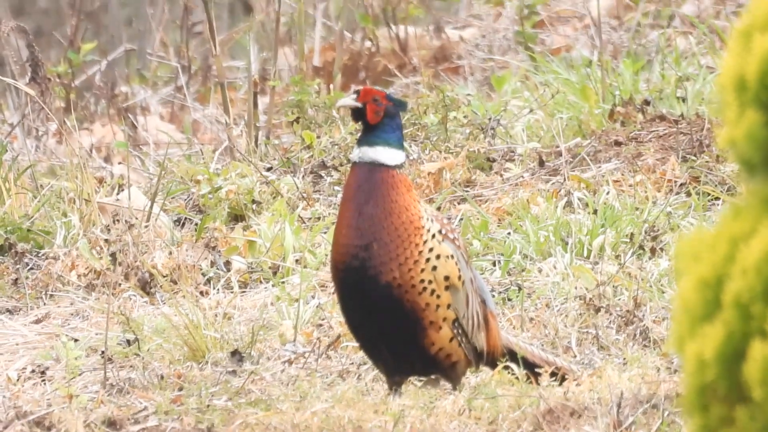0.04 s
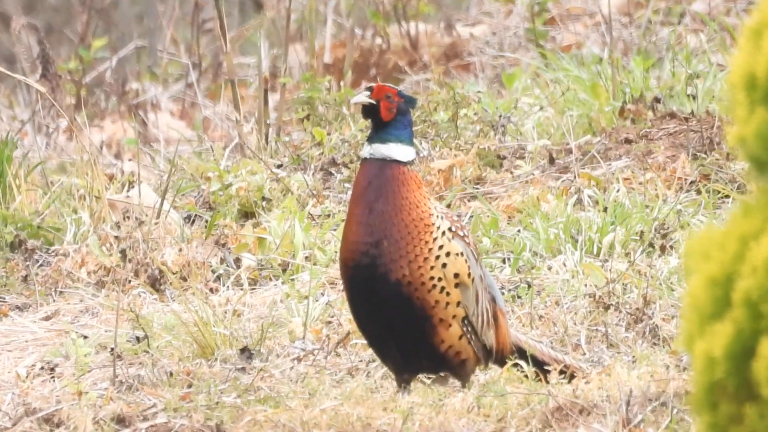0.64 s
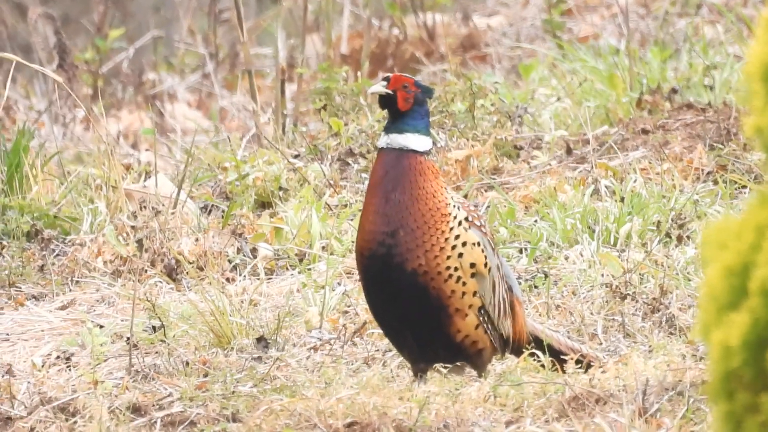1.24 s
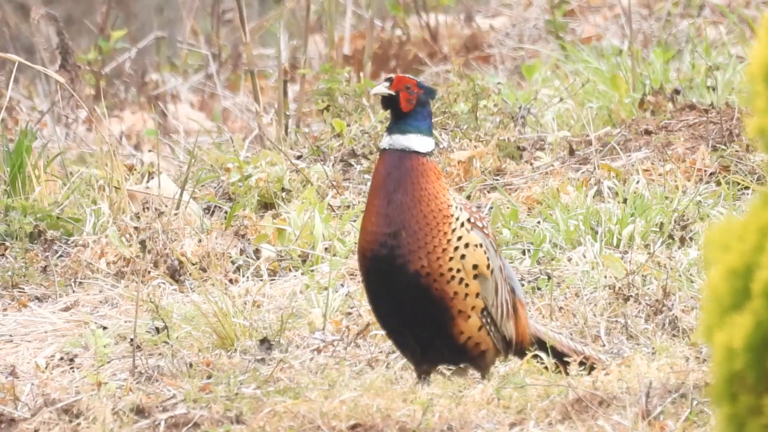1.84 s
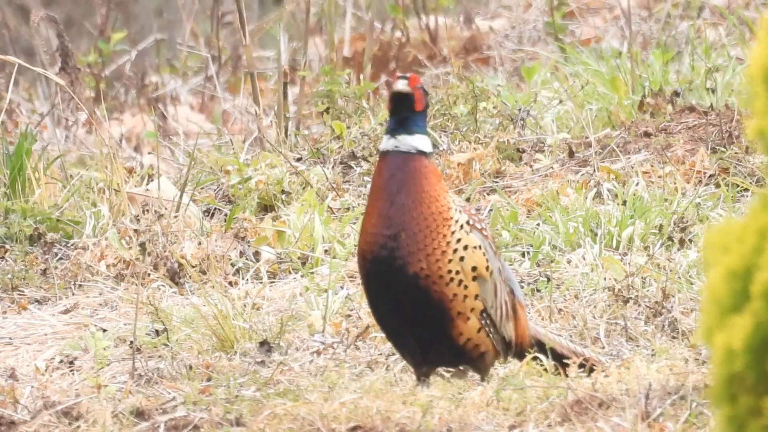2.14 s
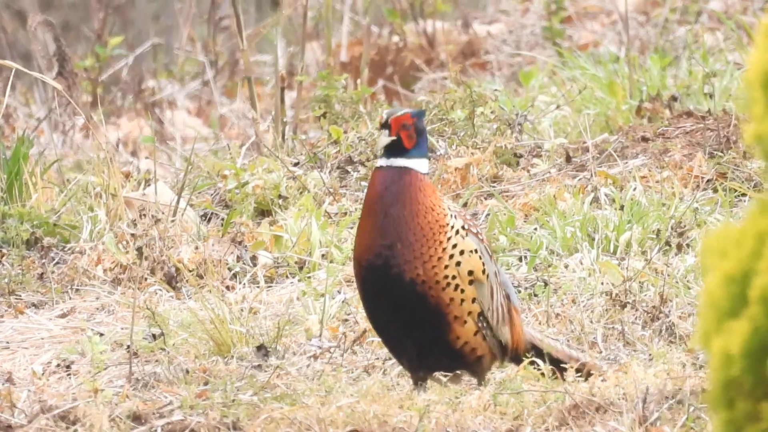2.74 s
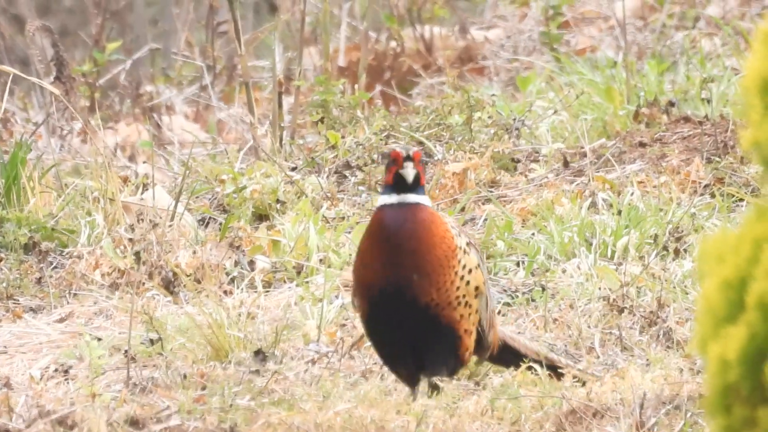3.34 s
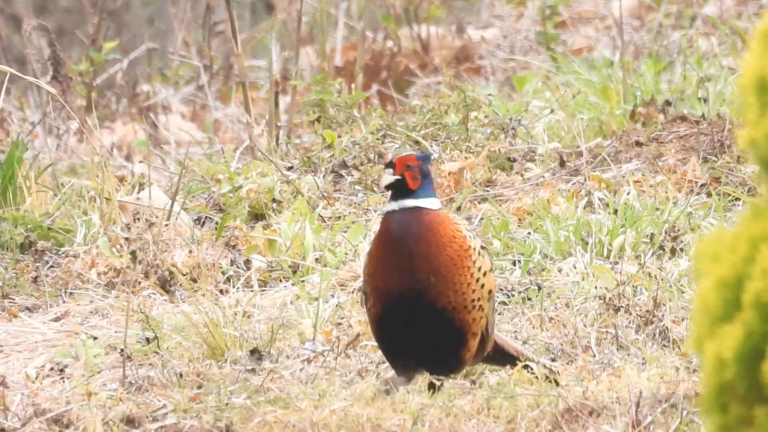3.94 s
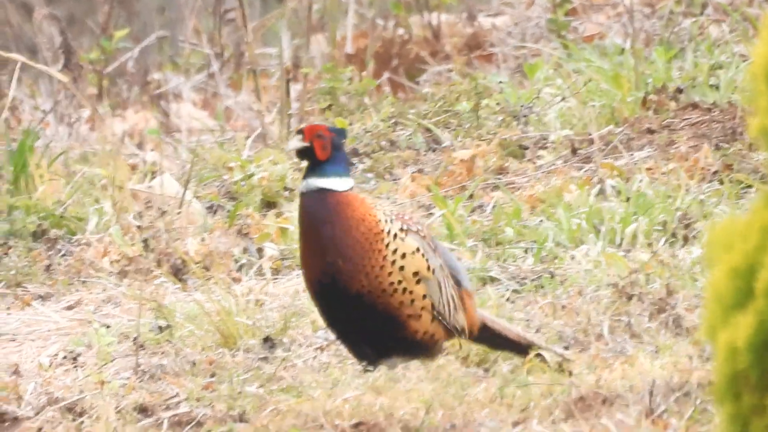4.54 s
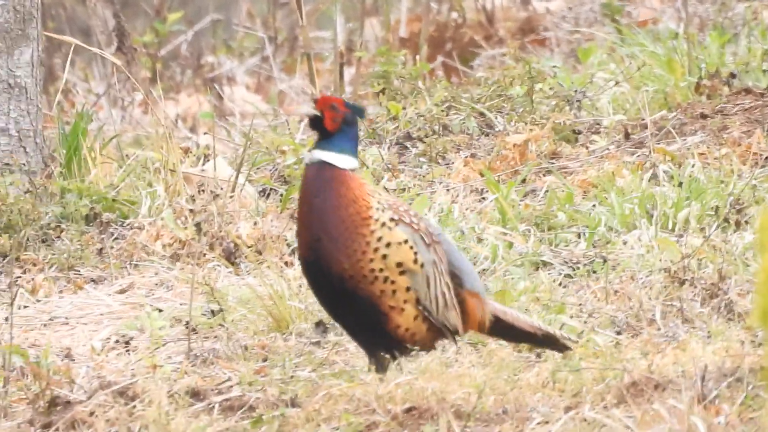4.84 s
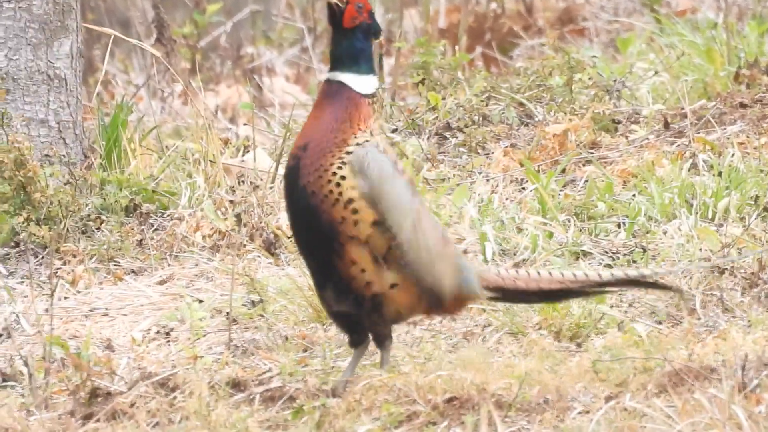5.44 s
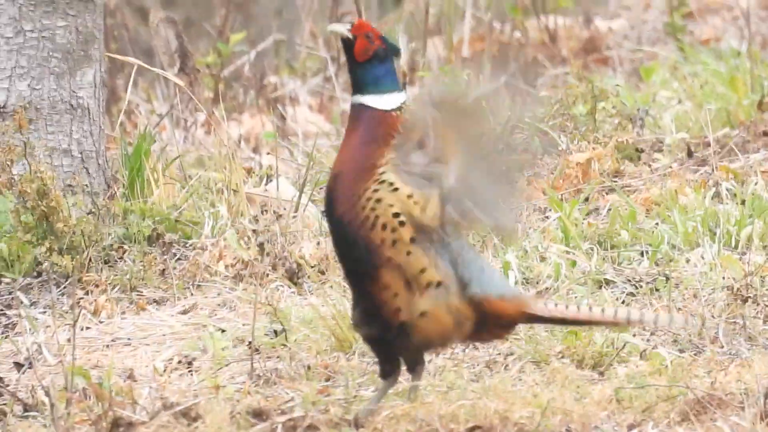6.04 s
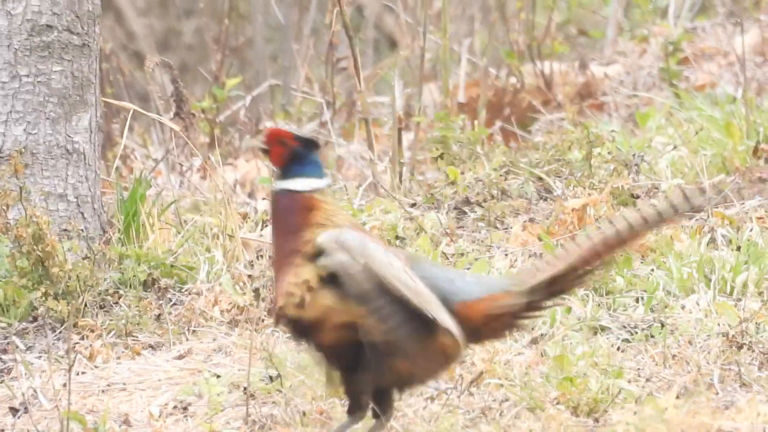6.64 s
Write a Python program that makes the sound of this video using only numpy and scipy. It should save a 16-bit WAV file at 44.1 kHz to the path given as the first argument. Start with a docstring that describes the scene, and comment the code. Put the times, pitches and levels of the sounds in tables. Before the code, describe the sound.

A quiet hush of open air lies over dry grass at the edge of a wood. Far off to the left, crows caw and small birds chirp and sing thin buzzy notes, while dry stalks tick faintly nearby. Near the end a pheasant, close and almost straight ahead, gives a loud, harsh two-note crow that rings briefly among the trees, followed by a soft, quick whir of wings.

```python
"""Dry grass by the edge of a wood, a cock pheasant close to the microphone and nearly straight ahead.
Late on he gives his harsh two-note crow, the syrinx flipping between tone and flutter under a rasp
from the open beak, and starts to whirr his wings. The wood throws the crow back and lets it ring.
Stalks tick nearby. Far off to the left, crows caw, a small bird sings thin buzzy notes and others
chirp, all over a quiet hush of open air."""
import sys
import numpy as np
from scipy import signal
from scipy.fft import rfft, irfft, next_fast_len
from scipy.io import wavfile
from scipy.ndimage import uniform_filter1d, map_coordinates

SR = 44100
rng = np.random.default_rng(int(sys.argv[2]) if len(sys.argv) > 2 else 0)


def int16_out(signal):
    """Quantize to a 16-bit WAV file."""
    q = np.round(np.clip(np.atleast_2d(signal).T, -1, 1) * 32767)
    wavfile.write(sys.argv[1], SR, q.astype(np.int16))


N = 295470
T = np.arange(N) / SR

# Pushes of the pheasant's voice, several to a note. Each row: start and length in seconds, top pitch,
# opening scoop and final sag in Hz, level in dB, roughness from 0 to 1.
VOICE_PUSHES = [(5.657, 0.023, 814, 12, 9.3, -47, 0.21), (5.671, 0.013, 893.4, 5.2, 6.13, -41.5, 0.83),
                (5.684, 0.022, 1029, 55.5, 6.4, -33.5, 0.54), (5.709, 0.019, 1052, 9.2, 4.5, -28.5, 0.27),
                (5.730, .031, 997.4, 6.1, 16.2, -33, 0.89), (5.763, .071, 1041, 2.2, 72, -29.5, 0.07),
                (6.147, .084, 1053, 115, 85, -29.5, 0.05), (6.231, .024, 1010, 5, 13, -30, 0.19),
                (6.255, 0.012, 964.6, 2.8, 11.6, -34.5, 0.82), (6.267, 0.022, 927.5, 2.8, 57, -33.5, 0.14)]
# Throat resonances that the flutter excites. Each row: centre and width in Hz, gain in dB.
THROAT_MODES = [(794, 24, -0.5), (938, 90, 0), (1346, 53, -15.5), (1507, 230, -14), (2144, 340, -14.5),
                (2610, 350, -18.5)]
# The throat's effect on the clear tone's harmonics. Each row: frequency in Hz, gain in dB.
THROAT_GAIN = [(800, -5.5), (1030, -0.5), (1700, -33), (1960, -13.5), (2050, -7.5), (2200, -14),
               (2800, -42)]
# The beak opening and closing, one list a note.
# Each row: time in seconds, rasp level in dB, mouth resonance in Hz.
BEAK_GAPES = [
    [(5.663, -59, 4405), (5.674, -37, 4354), (5.704, -31, 4550), (5.740, -28.5, 4492), (5.778, -32, 4247),
     (5.800, -34, 4058), (5.828, -42, 3454), (5.845, -54, 3397)],
    [(6.136, -59, 4914), (6.147, -41.5, 4882), (6.165, -32, 4710), (6.191, -33, 4047), (6.202, -35.5, 3908),
     (6.220, -35, 4840), (6.238, -33, 4384), (6.263, -35, 3906), (6.277, -45.5, 3575), (6.3, -68, 3500)],
]
# Colour of the rasp. Each row: frequency in Hz, gain in dB.
RASP_COLOUR = [(450, -64), (800, -5), (1500, -1), (2100, -3.5), (2700, -10.5), (3200, -6), (3700, 4),
               (4700, 2.5), (5600, -4.5), (6200, -11.5), (7300, -11), (9000, -25.5), (11500, -25.5),
               (13500, -49)]
# Narrow peaks and dips on that colour. Each row: centre and width in Hz, gain in dB.
BEAK_PEAKS = [(2684, 190, 10), (3763, 112, 12.5), (4116, 220, 7.5), (4900, 130, 1), (5570, 170, 9),
              (6730, 220, 6), (7300, 310, -9), (7700, 660, 2.5), (9100, 750, -6.5), (10100, 600, 6.5),
              (11150, 500, -7)]
# Wing strokes. Each row: centre in seconds, air puff level in dB, feather swish level in dB.
WING_STROKES = [(6.079, -83, -62.5), (6.454, -66.5, -62.5), (6.534, -67, -61), (6.58, -65, -58.5),
                (6.618, -92, -60), (6.676, -65, -56.5)]
# Colours of the puff and of the swish. Each row: frequency in Hz, gain in dB.
PUFF_COLOUR = [(40, -42), (90, -19), (170, -0.5), (280, 0), (500, 0), (1000, -66)]
FEATHER_COLOUR = [(90, -53), (220, 0), (450, -2), (1500, 0), (4500, -6.5), (8000, -21), (12000, -47)]
# Stalks snapping nearby. Each row: time in seconds, relative level in dB, ring centre and width in Hz,
# level of the broad crack over the ring in dB.
STALK_SNAPS = [(0.034, -50.5, 1370, 1000, 3.5), (0.295, -45.5, 4250, 900, -6),
               (0.402, -48.5, 1100, 1000, -10.5), (0.495, -54, 5540, 1400, 1),
               (1.451, -60.5, 7540, 1500, 11), (1.676, -45, 1400, 550, -9), (1.844, -53, 6800, 1300, -15),
               (2.572, -51.5, 6530, 1400, -14), (2.696, -46, 5630, 2200, -18), (3.853, -53, 1100, 600, -21),
               (4.393, -54.5, 8160, 3000, 2.5), (4.987, -49, 2480, 1000, -14),
               (5.168, -38, 4600, 2400, -10), (5.369, -52, 5960, 1400, 5.5), (5.46, -49.5, 855, 1000, -20),
               (5.504, -52.5, 4000, 3000, -3)]
# Colour of that crack. Each row: frequency in Hz, gain in dB.
CRACK_COLOUR = [(200, -31), (1200, 0), (3000, 2), (5000, -1), (7000, -5.5), (8600, -11.5), (10500, -18),
                (14000, -31)]
# Far crows. Each row: start and length in seconds, main resonance's level in dB and centre in Hz,
# harsh band's level in dB and centre in Hz.
CROW_CAWS = [(0.736, 0.36, -61.5, 1450, -74, 1910), (1.426, 0.23, -67, 1466, -65.5, 2026),
             (1.632, 0.13, -62.5, 1430, -67, 1160), (2.171, 0.39, -57.5, 1451, -68, 1830),
             (2.918, 0.16, -60, 1492, -63.5, 1900), (3.087, 0.19, -66.5, 1500, -67, 1700),
             (4.428, 0.4, -57.5, 1460, -65, 1856)]
# The small bird's song. Each row: start and length in seconds, first and last pitch in Hz, level in dB.
BUZZY_NOTES = [(1.033, 0.3, 6860, 8160, -70.5), (3.062, 0.26, 7000, 8100, -80),
               (6.327, 0.38, 7420, 7584, -59)]
# The nearest of the far chirps. Each row: start in seconds, first and last pitch in Hz, level in dB.
FAR_CHIRPS = [(.57, 6120, 6000, -70.5), (1.269, 2720, 2650, -76), (1.615, 5670, 5830, -71),
              (1.8, 2620, 2580, -68), (1.825, 5520, 5830, -70.5), (2.06, 5660, 5920, -72.5),
              (3.29, 5400, 5430, -74), (3.47, 3350, 3280, -71), (3.72, 2630, 2590, -70),
              (4.3, 1110, 1100, -65.5), (4.521, 7030, 6200, -69.5), (4.53, 1140, 1086, -57)]
TWITTER_REGISTERS_HZ = [5530, 2680, 5370, 3270]
# Colours of the wood's echoes and of its ringing tail. Each row: frequency in Hz, gain in dB.
ECHO_COLOUR = [(600, -28), (880, -18), (1030, -11.5), (1850, -22.5), (2060, -5), (3000, -41), (3800, -14.5),
               (4500, -22.5), (8000, -19)]
TAIL_COLOUR = [(650, -2), (880, 0), (1020, -0.5), (1200, -1.5), (1450, -2.5), (1750, 5), (2020, 0),
               (2400, -3.5), (4000, 1), (7000, 0.5), (13000, -9)]
# How long the wood rings. Each row: frequency in Hz, seconds to fall by 60 dB.
WOOD_DECAY = [(300, 3.2), (1000, 1.17), (2000, 1.23), (4000, 0.82), (6000, 0.76), (10000, 0.59)]
# Soft low swells in the air. Each row: centre and half-width in seconds, level in dB.
AIR_SWELLS = [(0.2, 0.039, -69), (2.063, 0.17, -69), (2.372, 0.071, -69), (4.247, 0.083, -69.5),
              (4.811, 0.044, -65.5)]
# Colours of the hush and of the swells. Each row: frequency in Hz, gain in dB.
HUSH_COLOUR = [(59, -74), (100, -66), (160, -16.5), (260, -7), (425, -2.5), (500, -3.5), (553, -8),
               (707, -7.5), (1250, -3.5), (1840, -7.5), (3390, -15), (3910, -13.5), (5310, -14),
               (9200, -26.5), (13000, -68)]
SWELL_COLOUR = [(80, -53), (170, -11.5), (260, 4.0), (400, -4.0), (900, -16), (2000, -69)]
# How alike the hush is left and right. Each row: frequency in Hz, correlation from -1 to 1.
HUSH_LIKENESS = [(60, 0.53), (170, 0.56), (510, 0.7), (1490, 0.62), (4330, -0.11), (12600, -0.3)]
# Lean of the near sounds. Each row: frequency in Hz, dB added on the left and taken off the right.
LEFT_LEAN = [(1000, 0.2), (2100, 0.23), (3800, 0.74), (7000, 0.96)]
# The microphone's response. Each row: frequency in Hz, gain in dB.
MIC_COLOUR = [(480, 0.5), (660, 7.0), (900, -1), (1300, 2.0), (1700, -1.0), (3500, 1.5), (4000, -5.0),
              (4500, -1.5)]


def pheasant(jitter=0.0363):
    """Close by, the syrinx flips between a clear tone and rough flutter, under the beak's harsh rasp."""
    flutter = resonate(rng.standard_normal(N), THROAT_MODES)
    pitch, tone_gain, flutter_gain = syrinx()
    rough = flutter_gain / (np.hypot(tone_gain, flutter_gain) + 1e-12)
    shaky_pitch = pitch * (1 + jitter * (rough + 0.04) * wobble(600))
    phase = phase_of(shaky_pitch)
    tone = -np.sqrt(2) * sum(gain_at(THROAT_GAIN, k * pitch) * np.cos(k * phase) for k in (1, 2, 3))
    return tone_gain * tone + flutter_gain * flutter + rasp(shaky_pitch, rough)


def syrinx(scoop_s=0.00891, attack_s=0.00607, release_s=0.0065):
    """Pitch, tone gain and flutter gain: a push slides up, then sags ever faster as the air runs out."""
    pitch = np.full(N, float(VOICE_PUSHES[0][2]))
    tone_gain, flutter_gain = np.zeros((2, N))
    for start, length, top_hz, scoop_hz, sag_hz, db, rough in VOICE_PUSHES:
        age = np.clip(T - start, 0, length)
        slack_hz = scoop_hz * np.exp(-age / scoop_s) + sag_hz * (age / length) ** 1.5
        pitch = np.where(T > start - attack_s / 2, top_hz - slack_hz, pitch)
        voiced = amp(db) * ramp((T - start) / attack_s + .5) * ramp((start + length - T) / release_s + .5)
        tone_gain += np.sqrt(1 - rough ** 2) * voiced
        flutter_gain += rough * voiced
    return uniform_filter1d(pitch, size=150), tone_gain, flutter_gain


def rasp(pitch, rough, weak_rate=.87, weak_db=-7, puff_db=4, mouth_width_hz=430, mouth_db=2.5):
    """The syrinx's two sides buzz and clash; buzz and mouth resonance fall as the beak closes."""
    times, _, mouth_hz = np.transpose(BEAK_GAPES[0] + BEAK_GAPES[1])
    envelope = sum(amp(np.interp(T, *np.transpose(note)[:2], left=-np.inf, right=-np.inf))
                   for note in BEAK_GAPES)
    slackening = (np.interp(T, times, mouth_hz) / np.median(mouth_hz)) ** .3
    phase = phase_of(pitch / 2 * slackening)
    buzz = np.zeros(N)
    for rate, db in [(weak_rate, weak_db), (1, 0)]:
        slip = rate * phase + .085 * wobble(330)  # uneven closures blur the high overtones most
        buzz += amp(db) * sum(np.cos(k * slip + rng.uniform(0, 2 * np.pi)) for k in range(3, 25))
    turbulence = .16 + .25 * rough
    # the air escapes in uneven puffs, one to a cycle of the buzz
    hiss = rng.standard_normal(N) * unit(amp(puff_db * np.cos(slip + 2 * wobble(500))))
    source = np.sqrt(1 - turbulence) * unit(buzz) + np.sqrt(2 * turbulence) * hiss
    hz, t, frames = signal.stft(amp(1.7 * wobble(600)) * source, SR, nperseg=256)
    mouth = amp(mouth_db * peak(hz[:, None], np.interp(t, times, mouth_hz), mouth_width_hz))
    swept = signal.istft(frames * mouth, SR, nperseg=256)[1][:N]
    beak = lambda f: amp(sum(db * peak(f, centre, width) for centre, width, db in BEAK_PEAKS))
    return envelope * unit(filtered(swept, lambda f: gain_at(RASP_COLOUR, f) * beak(f)))


def squeak(centre_s=6.141, half_width_s=0.0061, hz=2660, db=-47, octave_db=-3):
    """The tight syrinx squeaks for an instant before the second note catches."""
    phase = phase_of(hz * (1 + 0.0082 * wobble(300)))
    return amp(db) * bell(centre_s, half_width_s) * (np.sin(phase) + amp(octave_db) * np.sin(2 * phase))


def wings(puff_s=0.024, swish_s=0.021, ruffle_db=4):
    """Each stroke pushes a soft puff of air and swishes the stiff feathers."""
    puff = sum(amp(db) * bell(when, puff_s) for when, db, _ in WING_STROKES) * noise(PUFF_COLOUR)
    swish = sum(amp(db) * bell(when, swish_s) for when, _, db in WING_STROKES) * noise(FEATHER_COLOUR)
    return puff + swish * amp(ruffle_db * np.tanh(wobble(200)))


def stalks(rise_s=0.0026, snap_s=0.0007, ring_cycles=2.5, crumble_s=0.025, crumble_db=-23, top_hz=11500):
    """Dry stalks nearby snap in their own resonance, thick low ones for longer, and crumble in grains."""
    crack_noise, grains = noise(CRACK_COLOUR), unit(amp(3 * wobble(700)))
    out, t = np.zeros(N), np.arange(SR // 10) / SR
    f, age = np.fft.rfftfreq(len(t), 1 / SR), np.maximum(t - rise_s, 0)
    faint_snaps = [(t[-1] + place * (T[-1] - 2 * t[-1]), -62, 2500 + 4500 * thin, 1500, -6)
                   for place, thin in rng.random((12, 2))]
    for when, db, hz, width_hz, crack_db in STALK_SNAPS + faint_snaps:
        span = round((when - rise_s / 2) * SR) + np.arange(len(t))
        snap = np.exp(-age / (snap_s + ring_cycles / hz))
        crumble = amp(crumble_db) * grains[span] * np.exp(-age / crumble_s)
        shape = ramp(t / rise_s) * (snap + crumble)
        ring = unit(irfft(rfft(rng.standard_normal(len(t))) * resonance(f, hz, width_hz)))
        tick = unit(shape * ring) + amp(crack_db) * unit(shape * crack_noise[span])
        out[span] += amp(db - 6) * np.sqrt(np.mean(shape ** 2)) * tick
    return filtered(out, lambda hz: 1 / np.sqrt(1 + (hz / top_hz) ** 16))


def crows(rise_s=0.062, fall_s=0.076, waver_hz=29, drift_hz=14, clear_share=.68):
    """Hoarse caws blurred by distance: a wavering partial and noise in two throat resonances."""
    waver = waver_hz * wobble(250) + drift_hz * wobble(22)
    out = np.zeros(N)
    breathy, hoarse = rng.standard_normal((2, N))
    for start, length, db, hz, harsh_db, harsh_hz in CROW_CAWS:
        partial = np.sqrt(2 * clear_share) * np.sin(phase_of(hz + waver))
        breath = np.sqrt(1 - clear_share) * resonate(breathy, [(hz, 200, 0)])
        harsh = resonate(hoarse, [(harsh_hz, 420, 0)])
        shape = ramp((T - start) / rise_s) * ramp((start + length + fall_s / 2 - T) / fall_s)
        out += shape * (amp(db) * (partial + breath) + amp(harsh_db) * harsh)
    return out


def small_birds(trill_hz=123, sweep_hz=320, rise_s=0.12, fall_s=0.14, chirp_s=0.076):
    """A thin gliding whistle flicks up and down, wider when sung harder; short chirps lie farther off."""
    out = np.zeros(N)
    trill = np.tanh(1.8 * np.sin(phase_of(trill_hz * (1 + 0.021 * wobble(25)))))
    waver = wobble(900)
    for start, length, first_hz, last_hz, db in BUZZY_NOTES:
        glide = np.interp(T, [start, start + length], [first_hz, last_hz])
        effort = np.interp(db, [-70, -60], [.6, 1])
        pitch = glide + effort * sweep_hz * trill + 70 * waver
        shape = ramp(np.minimum((T - start) / rise_s, (start + length - T) / fall_s))
        out += shape * amp(db) * np.sqrt(2) * np.sin(phase_of(pitch))
    for start, first_hz, last_hz, db in FAR_CHIRPS:
        pitch = np.interp(T, [start, start + chirp_s], [first_hz, last_hz]) + 190 * waver
        out += amp(db) * bell(start + chirp_s / 2, chirp_s / 2) * np.sin(phase_of(pitch))
    return out * amp(1.6 * wobble(120))


def twitter(db=-78, spread_db=2.0, half_width_s=0.031, glide=0.017, count=80):
    """Birds deep in the wood: brief wavering glides in a few registers, overlapping at random."""
    out, t = np.zeros(N + SR), np.arange(SR // 5) / SR
    progress = np.clip((t - t.mean()) / half_width_s, -4, 4)
    waver = np.pad(wobble(540), (0, SR))
    for k, (late, height, slope, size) in enumerate(rng.standard_normal((count, 4))):
        span = int(ramp((k + late / 2) / count) * N) + np.arange(len(t))
        register = TWITTER_REGISTERS_HZ[k % len(TWITTER_REGISTERS_HZ)]
        pitch = register * (1 + 0.043 * height + glide * slope * progress) + 130 * waver[span]
        out[span] += amp(db + spread_db * size) * np.exp(-progress ** 2) * np.sin(phase_of(pitch))
    return out[:N]


def grass(x, db=-2.0, scatter_s=0.005, above_hz=2500):
    """Stalks around the microphone scatter the treble, in opposite polarity left and right."""
    t = np.arange(SR // 25) / SR
    paths = unit(rng.standard_normal(len(t)) * t * np.exp(-2 * t / scatter_s)) / np.sqrt(len(t))
    side = filtered(signal.fftconvolve(x, paths)[:N], lambda f: f ** 4 / (f ** 4 + above_hz ** 4))
    return amp(db) * np.array([side, -side])


def woodland(x, edge_s=.104, deep_s=.275, deep_db=-15, tail_db=-12.5, build_s=0.019, width=0.51):
    """Echoes from the wood's edge and from deeper in, and a ringing tail scattered by the trunks."""
    hz, t, frames = signal.stft(rng.standard_normal((2, SR)), SR, nperseg=256)
    decay = amp(-60 * t / along(WOOD_DECAY, hz)[:, None])
    tail = signal.istft(frames * decay * (1 - np.exp(-t / build_s)), SR, nperseg=256)[1]
    mid, side = signal.fftconvolve(x[None], tail / np.linalg.norm(tail[0]), axes=1)[:, :N]
    diffuse = filtered(stereo(mid, width * side), lambda f: gain_at(TAIL_COLOUR, f))
    delayed = lambda seconds: np.pad(x, (round(seconds * SR), 0))[:N]
    echoes = delayed(edge_s) + amp(deep_db) * dulled(delayed(deep_s), 1800)
    return amp(tail_db) * diffuse + filtered(echoes, lambda f: gain_at(ECHO_COLOUR, f))


def hush(db=-62.5, sway_db=2.0, patchy_db=3.0):
    """Open air all round the microphone, in faint shifting patches, with a few soft low swells."""
    frames = signal.stft(rng.standard_normal((2, N)), nperseg=1024)[2]
    patches = uniform_filter1d(rng.standard_normal(frames.shape[1:]), size=3, axis=0)
    patches = uniform_filter1d(patches, size=10, axis=1)
    patchy = signal.istft(frames * amp(patchy_db * unit(patches)), nperseg=1024)[1][:, :N]
    spread = lambda hz: np.arccos(along(HUSH_LIKENESS, hz)) / 2
    mid_side = lambda hz: gain_at(HUSH_COLOUR, hz) * [np.cos(spread(hz)), np.sin(spread(hz))]
    air = amp(db) * unit(stereo(*filtered(patchy, mid_side)))
    air += dulled(air, 900) * (amp(sway_db * wobble(2.7)) - 1)  # only the low rush sways
    swells = sum(amp(level) * bell(when, half_width) for when, half_width, level in AIR_SWELLS)
    return air + swells * noise(SWELL_COLOUR)


def amp(db):
    return 10 ** (np.asarray(db) / 20)


def unit(x):
    return x / np.sqrt(np.mean(x ** 2) + 1e-20)


def ramp(x):
    return np.clip(x, 0, 1)


def bell(centre_s, half_width_s):
    return np.exp(-np.minimum(((T - centre_s) / half_width_s) ** 2, 50))


def phase_of(hz):
    return 2 * np.pi * np.cumsum(hz) / SR


def stereo(mid, side):
    return np.array([mid + side, mid - side])


def wobble(rate):
    """A smooth random curve, rate knots a second."""
    return map_coordinates(rng.standard_normal(int(N * rate / SR) + 4), [T * rate])


def along(points, hz):
    """Interpolates (Hz, value) points on a log axis."""
    f, values = np.transpose(points)
    return np.interp(np.log(hz + 1), np.log(f + 1), values)


def gain_at(colour, hz):
    return amp(along(colour, hz))


def filtered(x, response):
    """x through a gain given as a function of frequency."""
    size = next_fast_len(N + 8192)
    return irfft(rfft(x, size) * response(np.fft.rfftfreq(size, 1 / SR)), size)[..., :N]


def dulled(x, corner_hz):
    return filtered(x, lambda f: 1 / (1 + (f / corner_hz) ** 2))


def noise(colour):
    """Coloured noise at rms 1."""
    return unit(filtered(rng.standard_normal(N), lambda hz: gain_at(colour, hz)))


def peak(f, centre, width):
    return 1 / (1 + (2 * (f - centre) / width) ** 2)


def resonance(f, centre, width):
    return (1j * f * width / (centre ** 2 - f ** 2 + 1j * f * width)) ** 2


def resonate(x, modes):
    """x through steep-sided resonances (centre Hz, width Hz, dB), at rms 1."""
    return unit(filtered(x, lambda f: sum(amp(db) * resonance(f, hz, width) for hz, width, db in modes)))


def scene():
    """The pheasant is close and ahead, his treble a little left; the far birds are off to the left."""
    near = pheasant() + squeak() + wings() + stalks()
    far = crows() + small_birds() + twitter()
    near_direct = filtered(near, lambda hz: amp(np.outer([1, -1], along(LEFT_LEAN, hz))))
    far_direct = far * amp([[1.6], [-1.6]])
    return near_direct + far_direct + grass(near + far) + woodland(near + amp(4.5) * far) + hush()


def record(dry, top_hz=13200):
    """The microphone has a slightly uneven response and keeps nothing above its band limit."""
    return filtered(dry, lambda hz: gain_at(MIC_COLOUR, hz) * (hz < top_hz))


dry = scene()
out = record(dry)
int16_out(out)
```